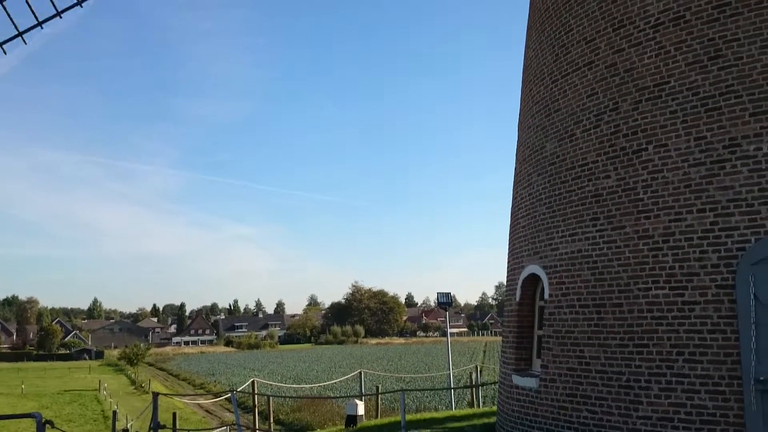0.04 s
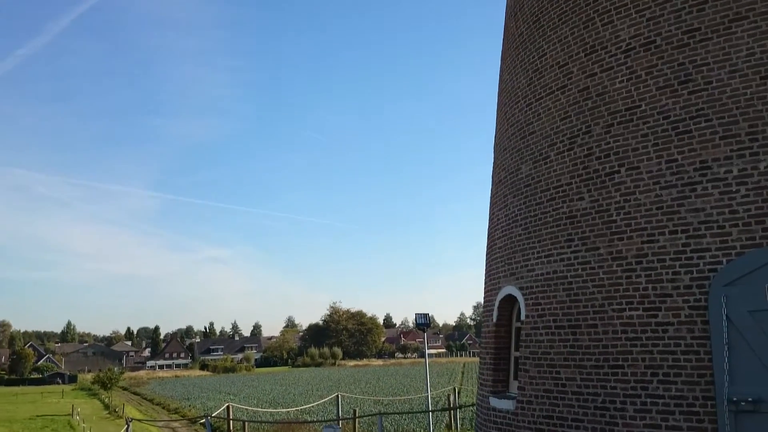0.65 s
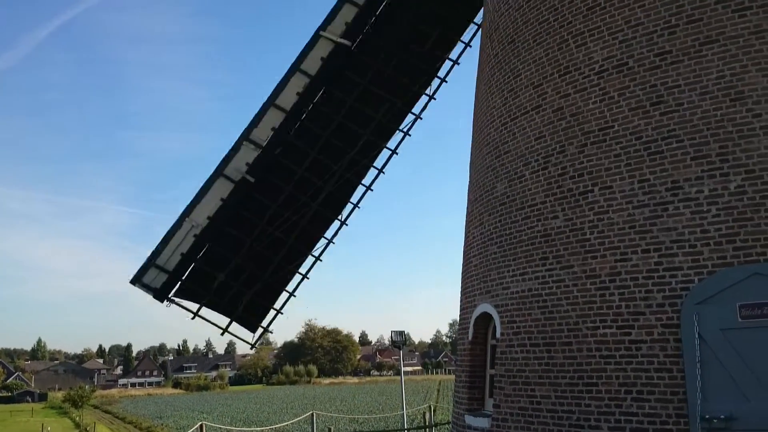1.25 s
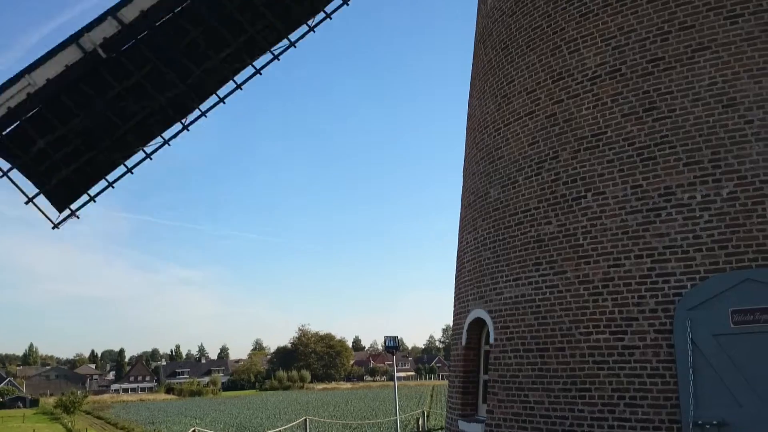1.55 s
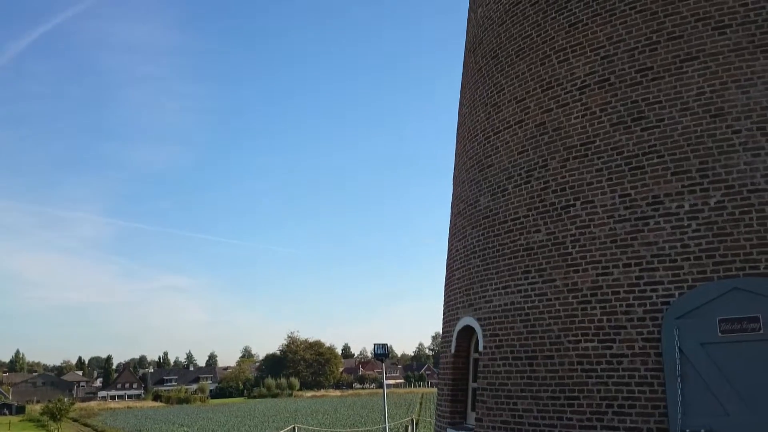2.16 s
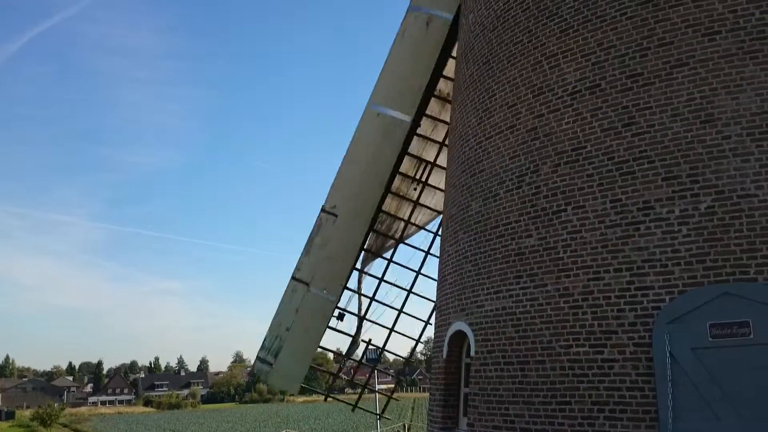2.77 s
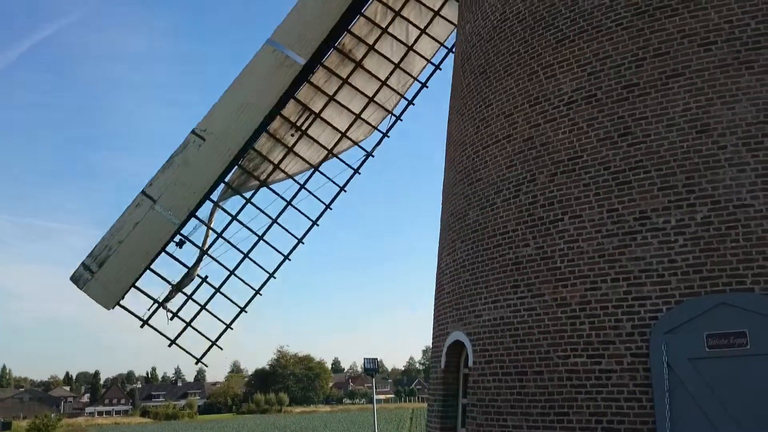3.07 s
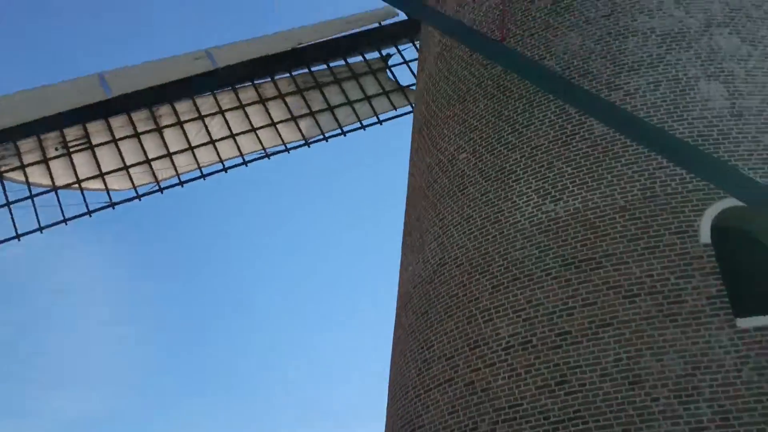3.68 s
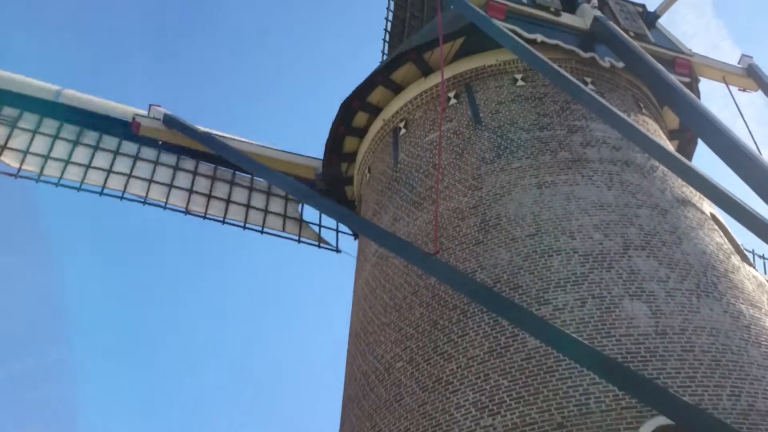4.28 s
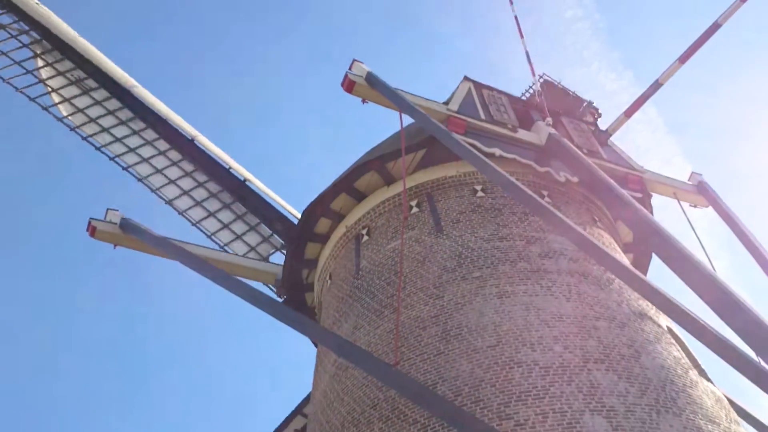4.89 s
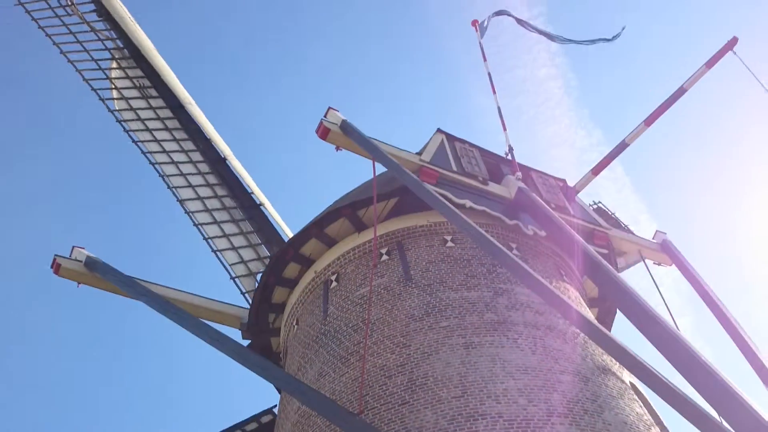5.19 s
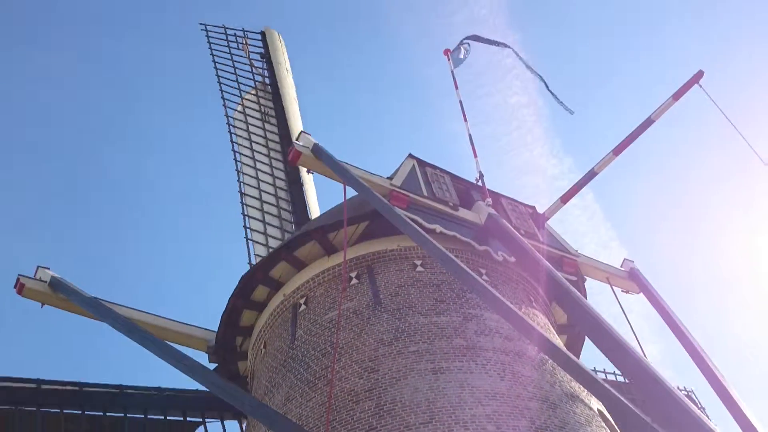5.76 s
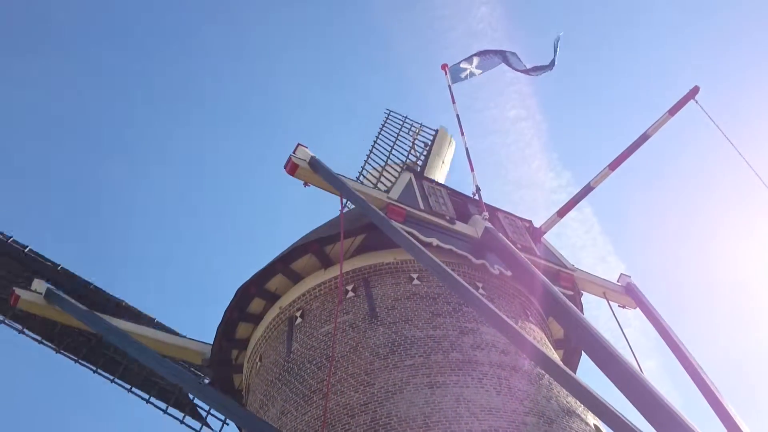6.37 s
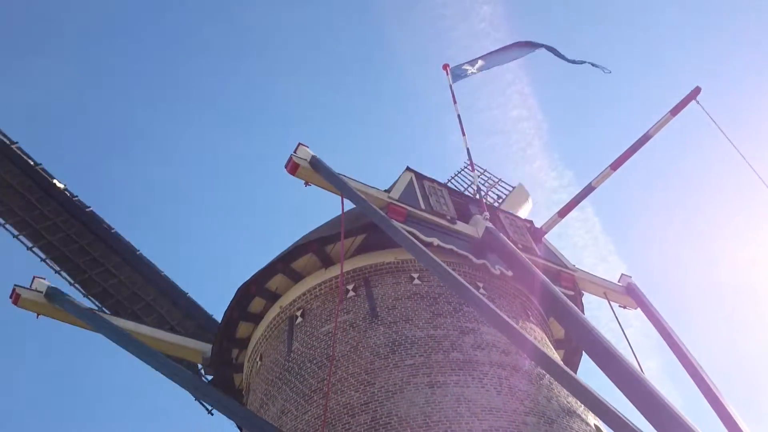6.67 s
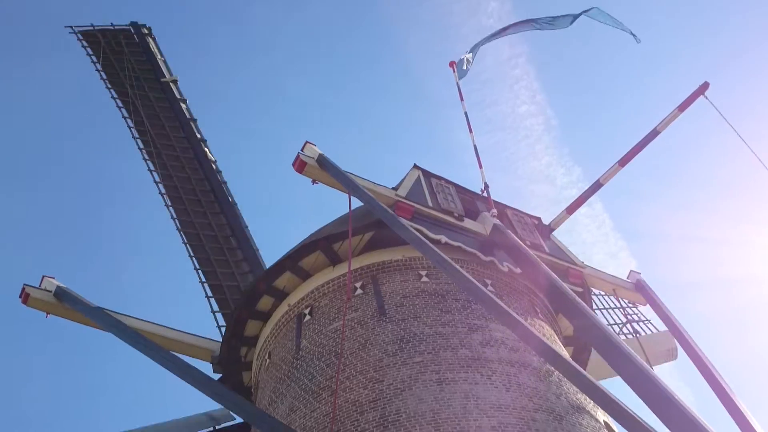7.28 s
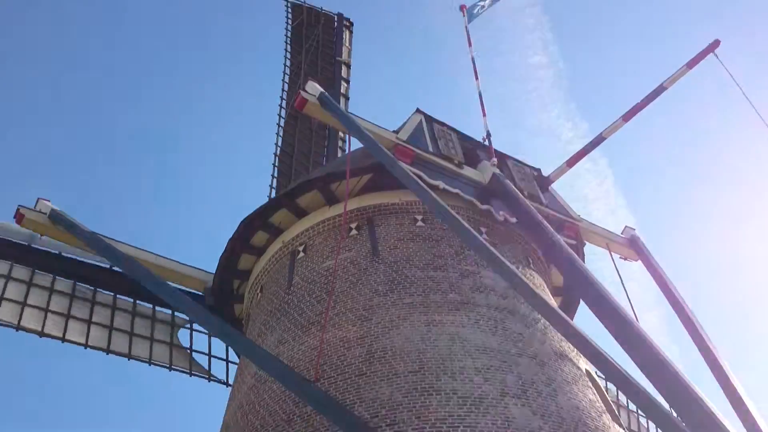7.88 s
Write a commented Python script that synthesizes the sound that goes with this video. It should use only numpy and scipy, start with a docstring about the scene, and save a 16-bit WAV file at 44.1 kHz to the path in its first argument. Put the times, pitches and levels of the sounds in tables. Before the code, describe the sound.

Outdoors beside a windmill, wind hits the microphone in rough, rumbling gusts with brief pops, mostly on the left. It slackens for a moment, builds again to a heavy, fluttering throb, and then fades. Throughout, small close handling sounds come through, also louder on the left: irregular clicks, thin metallic ticks, short creaks and a faint rustling hiss.

```python
"""Gusty wind buffets a hand-held camera at the foot of a turning windmill. From the start, swirls of air
(eddies) hit the left microphone opening (port) head on, while the sheltered right one softly rumbles.
Dry clicks, metallic ticks and soft creaks, louder on the left, sound over a faint hiss throughout.
Early gusts ease off by 2 s and return after 3 s. Near 5 s the camera turns up into the wind and the
air starts to throb. The wind is strongest just before 6 s and dies down after 7 s."""
import sys
import numpy as np
from scipy import signal
from scipy.fft import rfft, irfft
from scipy.io import wavfile
from scipy.ndimage import uniform_filter1d, map_coordinates

SR = 44100
rng = np.random.default_rng(int(sys.argv[2]) if len(sys.argv) > 2 else 0)


def log_audio(samples):
    """Write samples as a 16-bit WAV file to the path given in sys.argv[1]."""
    # one column per channel
    frames = np.atleast_2d(samples).T
    # limit to full scale, then quantise
    limited = np.clip(frames, -1, 1)
    pcm = np.round(limited * 32767).astype(np.int16)
    wavfile.write(sys.argv[1], SR, pcm)


N = 358974
TIME, FREQ = np.arange(N) / SR, np.fft.rfftfreq(N, 1 / SR)

# Levels in the tables are relative: the functions add their own gains.
# how the camera body and its ports colour small sounds: f/Hz, left/dB, right/dB
PORT_TONE = [(150, -17.5, -35), (586, 1, -18.5), (890, -2, -5.5), (1056, 3.5, -4.5), (1393, -3.5, -13.5),
             (1730, 0, -13.5), (2190, -2, -11.5), (2450, -5, -20), (3880, -7, -21), (4600, -14.5, -27),
             (6300, -17, -30.5), (7280, -9.5, -23.5), (8360, -12.5, -43), (9300, -18.5, -29),
             (10700, -21.5, -44.5), (12000, -17.5, -46), (13600, -38, -40), (14900, -26.5, -46),
             (16000, -38, -44.5)]
# the ringing notes of a small metal fitting on the camera: f/Hz, level/dB, time to fade by 60 dB/s
METAL_NOTES = [(1960, -8, 0.035), (3200, -3, .014), (4020, 2, 0.046), (4900, -9, .025), (6200, -8, .025),
               (8200, -7, .02)]
# the right port hears sounds first, until the camera swings upward: t/s, head start/s
RIGHT_LEAD = [(0, .00018), (3.2, .00013), (4.8, 0)]
# fine rustling: t/s, level/dB
RUSTLE_LEVEL = [(0, -47.5), (.06, -54), (.5, -57), (1.05, -58), (1.4, -61.5), (2.25, -55.5), (2.9, -64),
                (3.1, -58.5), (4.6, -63.5), (5.2, -60.5), (5.5, -63), (6.05, -67.5), (6.37, -53),
                (6.55, -64.5), (7.6, -65), (8.0, -60), (8.09, -57)]
# the clearer short creaks: t/s, level/dB, centre f/Hz
CLEAR_CREAKS = [(.367, -46, 2010), (0.469, -43, 2449), (0.593, -45.5, 2400), (.682, -47, 2483),
                (1.375, -47, 2205), (2.665, -45.5, 1889), (3.537, -42.5, 2097), (3.72, -43, 1980),
                (4.648, -56, 1700), (4.845, -43.5, 1902), (5.468, -48.5, 2395), (5.851, -43, 1897),
                (6.518, -48, 2048), (6.634, -49.5, 2007), (6.705, -45.5, 1695), (6.968, -50.5, 1750),
                (7.701, -48.5, 2108), (7.864, -44.5, 2676)]
# clicks and ringing ticks: t/s, level/dB, brightness/dB, tail/dB, ring/dB
CLICK_HITS = [(0.084, -44, -4, 12, -52), (0.114, -48, -7, -15, -57), (0.134, -36, -10.5, -14, -47),
              (0.216, -58, 17, -14, -73), (0.7494, -37.5, -18, -3.5, -44.5), (0.898, -55, -9, -12, -46),
              (0.97, -60, -10, -8, -49), (1.04, -45.5, -24, 1, -60), (1.107, -49, -18, -15, -47.5),
              (1.177, -52.5, -25, -23, -72), (1.638, -56, 20, -4, -63), (1.6822, -47.5, -17, -2, -65),
              (1.786, -53.5, 16, -11, -74), (1.806, -52, -15, -21, -61), (1.833, -51, -2, -25, -66),
              (1.914, -47.5, -10, -6, -45), (1.959, -50.5, -4, -12, -52), (1.982, -42, -11.5, -14, -52),
              (2.044, -39, -8, -4, -63), (2.107, -62, -17, -12, -49), (2.134, -55.5, 10, -16, -53),
              (2.186, -40.5, -10, -4, -63), (2.319, -43.5, -5, 8, -51), (2.705, -43, -14.5, 13, -74),
              (2.9425, -48, -5, 0, -44.5), (2.988, -52, -13, -5, -55), (3.016, -41, -8, -6, -47),
              (3.068, -34, -17, -7.5, -43), (3.168, -45.5, -17, 1, -58), (3.2, -62, -12, -10, -52),
              (3.222, -41, -10, -3, -52), (3.847, -40, -19, -3.5, -60), (4.002, -56, -14.5, -18, -52.5),
              (4.027, -59, -8, -17, -57), (4.073, -55, -13, -20, -53), (4.18, -46, -3, -21, -50),
              (4.198, -40.5, 7, 3, -63), (4.208, -48, -13, -5, -55), (4.698, -62, -10, -7, -68),
              (4.807, -53, -9, -1, -76), (4.866, -52.5, -13, 9, -61), (4.962, -51.5, 27, -2, -72),
              (5.0373, -47.5, -9, -24, -51.5), (5.089, -54, -8, -18, -58), (5.113, -47.5, 0, -31, -54),
              (5.1751, -40.5, -8, -11.5, -51), (5.268, -49, 4, -5, -58), (5.305, -52, -5, -18, -68),
              (5.32, -45.5, -6.5, -2, -70), (5.898, -47.5, 7, -4, -56), (6.094, -45, -9, -0.5, -53),
              (6.231, -40.5, -9, -11.5, -70), (6.321, -43, 24, -20, -69), (6.3887, -42, -21.5, -2, -69),
              (7.034, -42, -16.5, -2, -52), (7.22, -53, -14, 2, -59), (7.268, -56, -16, -9, -75.5),
              (7.379, -43.5, -8, 3.5, -51.5), (7.391, -58, 8, -4, -69), (7.407, -48.5, -3, -2, -62),
              (7.7229, -49, -8, 0, -64), (8.0286, -60, 50, 3.5, -81)]
# wind around the sheltered port: t/s, level/dB
SHELTERED_LEVEL = [(0, -37.5), (.26, -35), (.5, -33), (1.05, -28), (1.55, -38), (1.87, -28.5), (2.3, -38.5),
                   (2.62, -32.5), (3.45, -38), (3.78, -29), (4.2, -27.5), (4.6, -39), (5.55, -30.5),
                   (6.3, -36.5), (7.1, -39.5), (7.6, -43.5), (8.14, -41.5)]
# tone of the rumble on the sheltered port: f/Hz, level/dB
RUMBLE_TONE = [(5, 5), (18, 7), (40, -6.5), (65, -6.5), (110, -16.5), (200, -19), (400, -38.5), (1000, -55),
               (4000, -100)]
# tone of the rush on the sheltered port: f/Hz, level/dB
RUSH_TONE = [(40, -21), (110, -0.5), (190, 0.5), (310, -3), (410, -7.5), (500, -14), (620, -26), (800, -33),
             (1500, -67.5), (4000, -86.5)]
# the steady wind on the left port: t/s, level/dB, eddy rate/Hz
STEADY_WIND = [(0, -35.5, 119.4), (.25, -29.5, 221.4), (.45, -31, 159.2), (.7, -25, 169.1),
               (1.15, -26.5, 160.2), (1.7, -30, 149.2), (2.15, -32, 160), (2.9, -31.5, 180.4),
               (3.3, -25, 200.1), (3.6, -22, 189.4), (4.62, -22, 190.3), (5.15, -21, 206.1),
               (5.7, -16.5, 170.2), (6.15, -20.5, 185.2), (7.05, -17.5, 145), (7.7, -27.5, 129.9),
               (8.14, -32.5, 160.3)]
# gusts on top of the steady wind: start t/s, length/s, level/dB, eddy rate/Hz
WIND_GUSTS = [(0.522, 0.082, -24, 119.4), (0.73, 0.027, -14, 330), (0.831, 0.1, -16, 344.6),
              (0.975, 0.081, -22, 260.3), (1.058, 0.024, -13.5, 347.4), (1.269, 0.11, -21, 232.3),
              (1.439, 0.032, -18, 210.4), (1.566, 0.053, -18.5, 192.2), (3.058, 0.09, -22, 309),
              (3.16, 0.07, -16.5, 386.8), (3.479, 0.038, -22.5, 200.8), (3.624, 0.33, -16.5, 350.7),
              (3.962, 0.2, -15, 289.5), (4.161, .38, -16.5, 385.9), (4.68, 0.19, -18.5, 235.1),
              (4.89, 0.082, -16, 195), (5.228, 0.062, -18.5, 157.3), (5.478, 0.11, -14.5, 144.8),
              (5.671, 0.032, -8, 169.3), (5.765, 0.08, -8.5, 128.8), (5.979, 0.056, -15.5, 145.1),
              (6.478, 0.05, -15.5, 157), (6.794, 0.085, -18, 129.7), (7.008, 0.078, -21, 140.7),
              (7.185, 0.044, -22.5, 149.2), (7.301, 0.026, -19.5, 150.4), (7.377, 0.037, -22, 127),
              (7.531, 0.032, -20.5, 130.7), (7.787, 0.18, -23, 275.1)]
# short lulls between puffs: t/s, depth/dB
WIND_LULLS = [(4.64, -11), (5.121, -6.5), (6.1, -9), (6.57, -8.5), (6.89, -13), (7.15, -12), (7.47, -16),
              (7.754, -21)]
# single hard eddies that pop on the left port: t/s, depth/dB, drop time/s
HARD_EDDIES = [(0.7446, -2.5, 0.00039), (0.863, -2, 0.00058), (1.0701, -5, 0.00027), (1.0851, 1, 0.00022),
               (1.3318, -12, 0.00024), (3.1804, -1.5, 0.00038), (3.1948, -3, 0.00024),
               (3.236, 0.5, 0.00038), (3.2929, -11, 0.00015), (3.637, -1.5, 0.00033), (3.6765, 0.5, .00022),
               (3.9418, -2.5, 0.00029), (3.9723, -3, 0.00021), (3.989, 1.5, 0.00043), (4.0086, -3, 0.00033),
               (4.1102, -5.5, 0.00029), (4.166, -2.5, 0.00027), (4.2527, -5, .00026), (4.303, -4, 0.00027),
               (4.3554, 3, .00036), (4.4401, -2, 0.00026), (4.4709, 0.5, 0.00028), (4.4965, -0.5, 0.00019),
               (4.682, -7, 0.00045), (4.7446, -3, 0.00045), (4.9543, -0.5, 0.00048), (5.2456, -12, .00034),
               (5.497, 0.5, 0.0005), (5.538, 1.5, 0.00077), (5.6883, -1.5, 0.00047), (5.8923, -2, 0.00036),
               (5.9974, 0, .0008), (7.926, -3.5, 0.00058), (7.947, -1.5, 0.00057)]


def gain_of(db):
    """Turns decibels into a number to multiply by."""
    return 10 ** (np.asarray(db) / 20)


def evened(x):
    """Scales a signal to an average power of 1."""
    return x / np.sqrt(np.mean(x ** 2) + 1e-20)


def follow(rows):
    """Joins a table's points in time, giving one curve per column."""
    times, *columns = np.transpose(rows)
    return [np.interp(TIME, times, column) for column in columns]


def tone_gains(rows):
    """Turns a tone table's dB columns into a gain for every frequency."""
    hz, *columns = np.transpose(rows)
    return np.array([gain_of(np.interp(np.log(FREQ + 1), np.log(hz + 1), db)) for db in columns])


def noise(shape):
    """Noise whose frequencies are weighted by shape."""
    return evened(irfft(rfft(rng.standard_normal(N)) * shape, N))


def waver(rate_hz):
    """A random wobble, up to about rate_hz."""
    return noise(1 / (1 + (FREQ / rate_hz) ** 4))


def add(mix, start_s, sound):
    """Mixes a sound in at start_s."""
    part = mix[max(round(start_s * SR), 0):][:len(sound)]
    part += sound[:len(part)]


def upturn():
    """How far the camera has turned up into the wind, 0 to 1."""
    return np.interp(TIME, [4.5, 5.3], [0, 1])


def metal_ring(t, detune=1, uneven_db=0):
    """A small metal part's notes fade after a blow; uneven_db favours some of them at random."""
    chances = rng.uniform(-1, 1, len(METAL_NOTES))
    return sum(gain_of(db + uneven_db * chance - 60 * t / fade_s) * np.cos(2 * np.pi * hz * detune * t)
               for (hz, db, fade_s), chance in zip(METAL_NOTES, chances))


def through_ports(sound, metal_db=-57):
    """A sound picks up a faint metallic ring and enters both ports, the right one partly scattered."""
    t = np.arange(4096) / SR
    left = sound + gain_of(metal_db) * signal.oaconvolve(sound, metal_ring(t))[:N]
    echoes = rng.standard_normal(len(t)) * np.exp(-t / 0.025)
    scattered = signal.oaconvolve(left, echoes / np.linalg.norm(echoes))[:N]
    lead_s, = follow(RIGHT_LEAD)
    right = .69 * np.interp(TIME + lead_s, TIME, left) + .72 * scattered
    return irfft(rfft(np.array([left, right])) * tone_gains(PORT_TONE), N)


def outdoor_hiss(air_db=-57, top_hz=2400, hiss_db=-75):
    """The faint, wavering rush of open air, and the microphones' own hiss."""
    swell = 1 + .3 * np.tanh(waver(10))
    air = noise(1 / (1 + (FREQ / top_hz) ** 4)) * gain_of(air_db) * swell
    return through_ports(air) + gain_of(hiss_db) * rng.standard_normal((2, N))


def rustle(ticks_per_s=170, spread_db=7, tick_s=0.0046, ticks_db=10, rub_db=13):
    """A fine rubbing hiss with tiny separate ticks in it."""
    level_db, = follow(RUSTLE_LEVEL)
    sizes = gain_of(spread_db * np.minimum(rng.exponential(1, N), 3.5))
    kicks = sizes * (rng.random(N) < ticks_per_s / SR)
    power = signal.lfilter([1], [1, -np.exp(-1 / (tick_s * SR))], kicks ** 2)  # each kick fades
    ticks = evened(np.sqrt(power) * noise(1 / np.hypot(1, FREQ / 6000)))
    rub = rng.standard_normal(N) * gain_of(-2.5 * waver(23))
    return through_ports(gain_of(level_db) * (gain_of(ticks_db) * ticks + gain_of(rub_db) * rub))


def scuff(centre_hz, fade_s, width=0.27, rise_s=0.002):
    """One short rub: surfaces grip and slip unevenly, with a few tones of their own."""
    t, hz = np.arange(8192) / SR, np.fft.rfftfreq(8192, 1 / SR)
    band = 1 / (1 + (np.log((hz + 1) / centre_hz) / width) ** 2)
    peaks = gain_of(3 * evened(uniform_filter1d(rng.standard_normal(len(hz)), size=50)))
    slips = np.cumsum(np.repeat(rng.uniform(30, 120, 32), 256)) / SR  # 30 to 120 slips a second
    friction = np.exp(-1.5 * (slips % 1)) * rng.standard_normal(len(t))
    stroke = evened(irfft(rfft(friction) * band * peaks))
    return stroke * (1 - np.exp(-t / rise_s)) * np.exp(-t / fade_s)


def scuffs_and_creaks(count=240, scuffs_db=-61, spread_db=13, centre_hz=1950, creak_trim_db=5):
    """A few clear creaks among soft, dull scuffs that come at random."""
    out = np.zeros(N)
    for slot, (offset, size, pitch, length) in enumerate(rng.uniform(-0.99, 1, (count, 4))):
        stroke = scuff(centre_hz * np.exp(0.27 * pitch), fade_s=0.0052 * 2 ** length)
        add(out, (slot + offset) / count * N / SR, gain_of(spread_db * size) * stroke)
    out = gain_of(scuffs_db) * evened(out)
    for start_s, creak_db, hz in CLEAR_CREAKS:
        add(out, start_s, gain_of(creak_db + creak_trim_db) * scuff(hz, fade_s=0.028))
    return through_ports(out)


def clicks(snap_s=0.0053, tail_s=0.034, tail_top_hz=3200, knock_trim_db=15, ping_trim_db=17):
    """Each click is a sharp snap, a light metallic ping and a duller, fading chatter."""
    out, t, hz = np.zeros(N), np.arange(8192) / SR, np.fft.rfftfreq(8192, 1 / SR)

    def boost(db, centre_hz, narrowness):
        """Lifts the frequencies around centre_hz."""
        return gain_of(db * np.exp(-(narrowness * np.log2((hz + 1) / centre_hz)) ** 2))

    bite, hollow, woody = boost(5, 5200, 2), boost(4, 1140, 6), boost(4, 2200, 2)
    band = hz / np.hypot(hz, 1000) / np.hypot(1, (hz / 11000) ** 2)
    octaves = np.log2(np.clip(hz, 1200, 12000) / 3800)
    age = np.maximum(t - .005, 0)
    attack = 1 - np.exp(-age / 0.00071)
    ping_attack = 1 - np.exp(-age / 0.00063)
    for start_s, level_db, bright_db, tail_db, ring_db in CLICK_HITS:
        hardness_db = bright_db + 10  # harder hits are shorter and brighter
        snap = attack * np.exp(-age / snap_s * gain_of(0.24 * max(hardness_db, 0)))
        tail = attack * gain_of(tail_db - 5) * np.exp(-age / tail_s)
        strength = np.sqrt(np.mean((snap ** 2 + tail ** 2)[age > 0][:SR // 100]))  # first 10 ms
        snap_noise, tail_noise, chance = rng.standard_normal((3, len(t)))
        # every hit has a few tones of its own
        ripple = uniform_filter1d(uniform_filter1d(chance[:len(hz)], size=70), size=40)
        peaks = evened(gain_of(3.6 * evened(ripple)))
        spectrum = rfft(snap * snap_noise) * bite
        spectrum += rfft(tail * tail_noise) * hollow / np.hypot(1, hz / tail_top_hz)
        if hardness_db < 0:
            spectrum *= woody
        tilt = gain_of(0.3 * hardness_db * octaves)
        knock = irfft(spectrum * peaks * band * tilt) / strength
        ping = ping_attack * metal_ring(age, detune=1 + chance[-1] / 180, uneven_db=3)
        click = gain_of(level_db + knock_trim_db) * knock + gain_of(ring_db + ping_trim_db) * ping
        add(out, start_s - .0055, click)
    return through_ports(out)


def sheltered_wind(lumpy_db=3.5, flutter_db=2.06):
    """Slow lumps of pressure rumble on the right port; a hollow rush follows the wind more closely."""
    wind_db, = follow(SHELTERED_LEVEL)
    rumble = evened(noise(tone_gains(RUMBLE_TONE)[0]) * gain_of(lumpy_db * waver(10)))
    rush = evened(noise(tone_gains(RUSH_TONE)[0]) * gain_of(flutter_db * waver(33)))
    return gain_of(0.38 * wind_db - 11 - 2 * upturn()) * rumble + gain_of(wind_db - 2.5) * rush


def wind(rise_s=.016, fall_s=.018, lull_s=0.015):
    """Level (dB) and eddy rate (Hz) on the left port: gusts add to the breeze, and lulls cut in."""
    breeze_db, breeze_hz = follow(STEADY_WIND)
    power = gain_of(breeze_db) ** 2
    weighted_hz = power * breeze_hz  # the stronger wind has more say in the rate
    for start_s, length_s, level_db, eddy_hz in WIND_GUSTS:
        rise = np.clip((TIME - start_s) / rise_s, 0, 1)
        fall = np.exp(-np.clip((TIME - start_s - length_s) / fall_s, 0, 20))
        gust = (gain_of(level_db) * rise * fall) ** 2
        power += gust
        weighted_hz += gust * eddy_hz
    lull_db = sum(depth_db * np.exp(-((TIME - at_s) / lull_s) ** 2) for at_s, depth_db in WIND_LULLS)
    return 10 * np.log10(power) + lull_db, weighted_hz / power


def rasp(trim_db=-30, onset_hz=330, centre_hz=1550, width=0.24, tear_db=15.5):
    """Fast air tears at the rim of the port: a dense rasp that only the quickest gusts set off."""
    level_db, eddy_hz = wind()
    band = np.exp(-(np.log((FREQ + 1) / centre_hz) / width) ** 2 / 2)
    hiss = noise(band / np.hypot(1, (FREQ / centre_hz) ** 2))
    tearing = evened(hiss * gain_of(tear_db * waver(160)))
    return gain_of(level_db + trim_db) / np.hypot(1, (onset_hz / eddy_hz) ** 6) * tearing


def deep_rumble(trim_db=-6.5, centre_hz=50, width=0.92, lumpy_db=3, upturn_db=-3.5):
    """Eddies larger than the camera rumble, building up slowly and most in fast, lasting gusts."""
    level_db, eddy_hz = wind()
    speed_db = 5 * np.log2(eddy_hz / np.median(eddy_hz))
    push_db = uniform_filter1d(level_db + speed_db, size=SR)  # averaged over one second
    band = np.exp(-(np.log((FREQ + 1) / centre_hz) / width) ** 2)
    rumble = evened(noise(band) * gain_of(lumpy_db * waver(26)))
    return gain_of(push_db + trim_db + upturn_db * upturn()) * rumble


def throb(trim_db=-5, breakup_hz=240, thump_hz=84, lumpy_db=3):
    """Air peels off the upturned camera in nearly regular thumps; fast gusts break them up."""
    level_db, eddy_hz = wind()
    cycles = np.cumsum(thump_hz * np.exp(.2 * waver(25))) / SR
    dips = -np.exp(1.3 * np.cos(2 * np.pi * cycles))
    thumps = evened((dips - dips.mean()) * gain_of(lumpy_db * waver(9)))
    return gain_of(level_db + trim_db) * upturn() * thumps / np.hypot(1, (eddy_hz / breakup_hz) ** 4)


def with_pops(air, crest=0.35, build_s=0.0011, recover_s=0.002):
    """Hard eddies sweep smaller ones aside: pressure builds, drops steeply into suction and recovers."""
    pops, swept = np.zeros((2, N))
    t = (np.arange(1024) - 512) / SR
    rebound = np.exp(-(t / (2 * recover_s) - 1) ** 2)
    for at_s, depth_db, drop_s in HARD_EDDIES:
        fallen = (1 + np.tanh(t / drop_s)) / 2
        push = crest * (1 - fallen) * np.exp(-(t / build_s) ** 2)
        pulse = push - fallen * np.exp(-(t / recover_s) ** 2)
        pulse -= rebound * pulse.sum() / rebound.sum()  # push and pull balance out
        add(pops, at_s + t[0], gain_of(depth_db) * pulse)
        add(swept, at_s + t[0], np.exp(-(t / (2 * recover_s)) ** 2))
    return air / (1 + 2 * swept) + pops


def eddy_field(base_hz, slope=1.483, burstiness=0.44):
    """Swirling air, built octave by octave: small eddies burst out where larger ones suck hardest."""
    fineness = FREQ / base_hz
    shape = (1 + fineness ** 2) ** -slope * fineness / np.hypot(fineness, .1)
    spectrum = rfft(rng.standard_normal(N)) * shape
    field, covered = np.zeros(N), 0
    for octave in range(6):
        passed = 1 / (1 + (fineness / 2 ** octave) ** 6)
        eddies = irfft(spectrum * (passed - covered), N)
        if octave:
            stir = waver(base_hz * 0.2) - 0.38 * np.clip(evened(field), -2.5, 2.5)
            eddies *= evened(np.exp(burstiness * stir))
        field += eddies
        covered = passed
    return field


def buffeting(base_hz=150, suction=0.17, low_hz=24, upturn_hz=50, trim_db=-0.19):
    """Eddies drift past the left port; faster air carries them by sooner and so sounds brighter."""
    level_db, eddy_hz = wind()
    travelled = np.cumsum(eddy_hz) / base_hz
    path = N - 1 - abs(travelled % (2 * N - 2) - (N - 1))  # turns back at the field's end
    pressure = evened(map_coordinates(eddy_field(base_hz), [path], order=3, mode="mirror"))
    # partly even out chance swells, so that the gusts lead the loudness
    local_power = uniform_filter1d(uniform_filter1d(pressure ** 2, size=2200), size=2200)
    pressure /= (local_power + 1e-6) ** 0.11
    pressure -= suction * pressure ** 2  # dips run deeper than crests
    low_cut = signal.butter(1, low_hz, "high", fs=SR, output="sos")
    pressure = signal.sosfilt(low_cut, pressure - pressure.mean())
    # turned upward, the port catches less of the largest eddies
    thinned = signal.sosfilt(signal.butter(1, upturn_hz, "high", fs=SR, output="sos"), pressure)
    return gain_of(level_db + trim_db) * evened(pressure + upturn() * (thinned - pressure))


def scene():
    """Wind on each port, with the small sounds around the camera."""
    left = with_pops(buffeting() + deep_rumble() + throb() + rasp())
    right = sheltered_wind()
    return np.array([left, right]) + clicks() + rustle() + scuffs_and_creaks() + outdoor_hiss()


def record(dry):
    """Overload rounds off the strongest gusts; then the highest treble is cut."""
    ceiling, top_hz = .86, 15800
    rounded = dry / (1 + (dry / ceiling) ** 6) ** (1 / 6)
    treble_cut = signal.firwin(511, top_hz, window=("kaiser", 9), fs=SR)
    return signal.oaconvolve(rounded, treble_cut[None], "same", axes=1)


dry = scene()
out = record(dry)
log_audio(out)
```